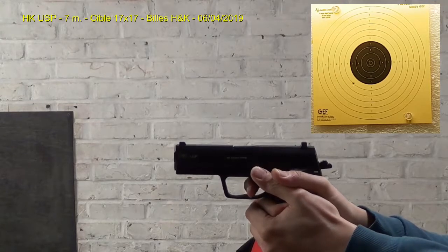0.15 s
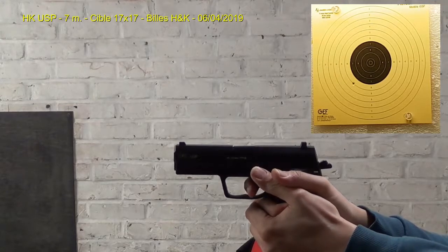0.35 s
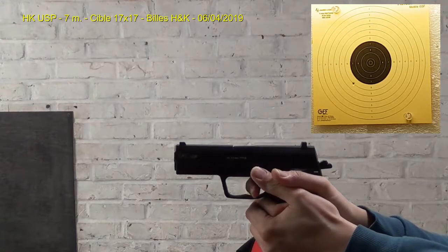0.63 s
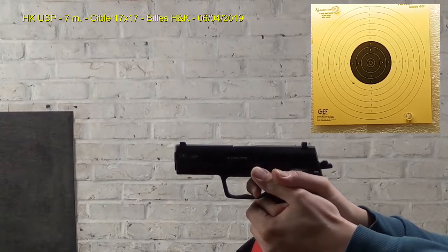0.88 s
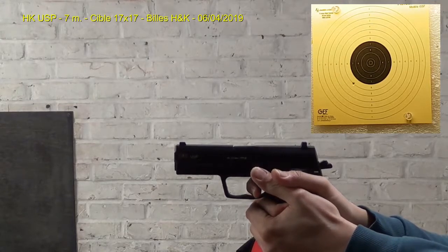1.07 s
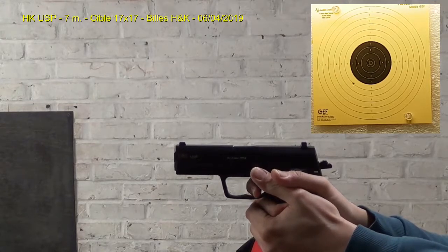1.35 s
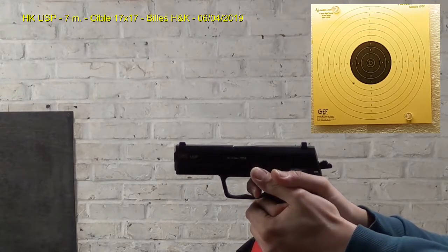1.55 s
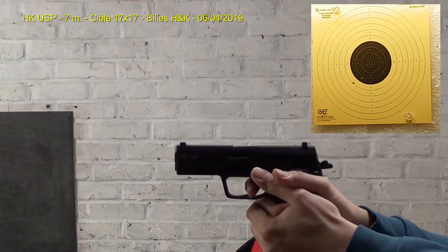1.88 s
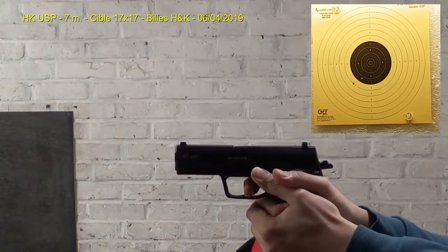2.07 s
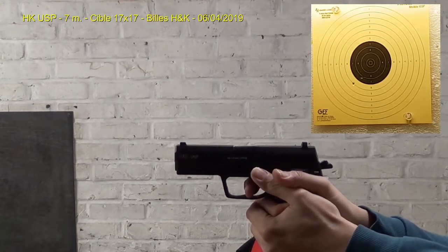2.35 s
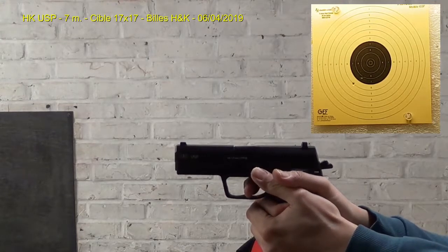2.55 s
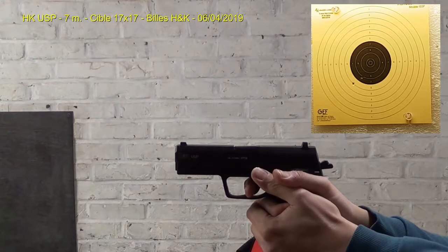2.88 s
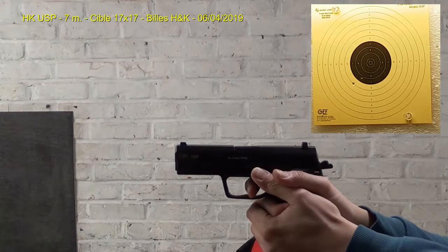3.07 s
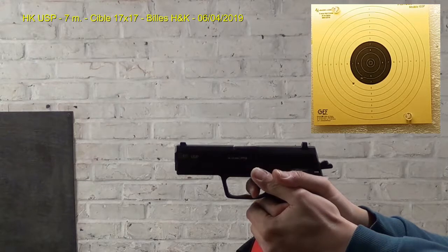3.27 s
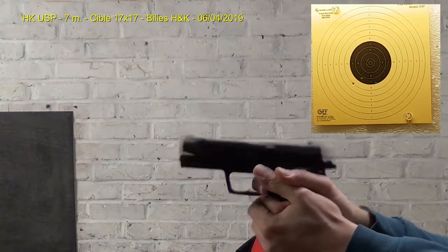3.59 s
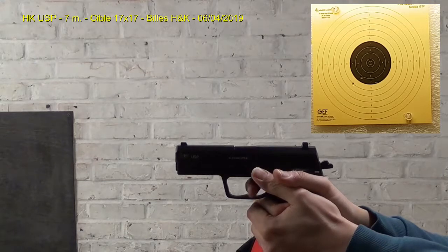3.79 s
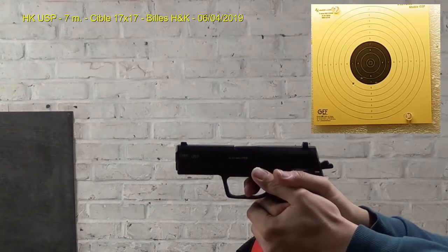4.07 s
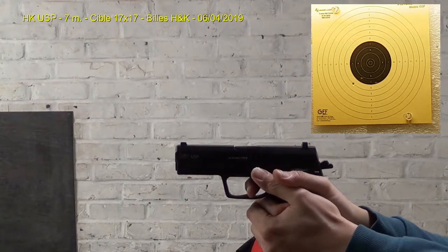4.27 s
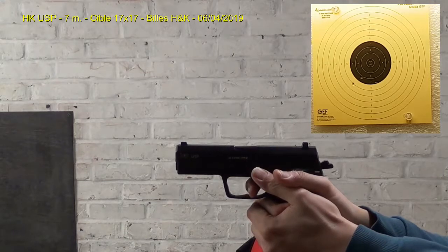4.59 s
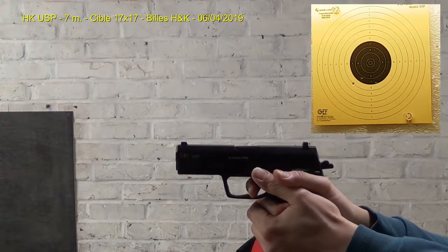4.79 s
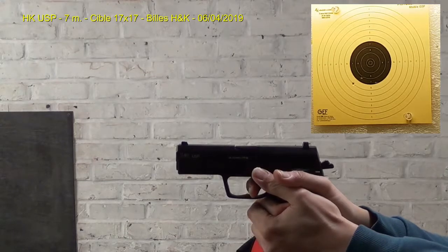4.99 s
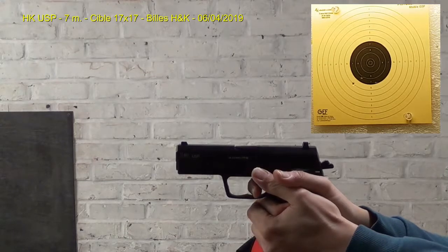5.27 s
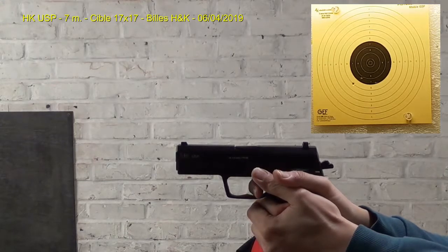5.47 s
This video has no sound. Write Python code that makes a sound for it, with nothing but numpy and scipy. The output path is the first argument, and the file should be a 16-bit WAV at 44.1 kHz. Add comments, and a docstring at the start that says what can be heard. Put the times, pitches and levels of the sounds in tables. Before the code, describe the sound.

A blowback air pistol fires three shots about two seconds apart in a hard brick room, close to the microphone. Each is a bright gas crack with a loud slide snap, followed at once by a pellet rattling in a far metal trap. After the first two, the action clacks home with a brief ring. Faint knocks and tiny trigger clicks fall between shots, and birds chirp softly outside over a steady hiss.

```python
"""Hard brick room: a blowback air pistol fires three shots close to a camera.
Each shot: hammer on valve, gas blast, slide on its rear stop, pellet rattling in the trap.
After the first two the action clacks home and rings slide and spring. Small knocks, a dull thud and
trigger ticks fall between shots. Birds chirp outside, over steady air, a thin whine and one far hum.
The camera's limiter flattens the shots and its gain creeps back up."""
import sys
import numpy as np
from scipy import signal
from scipy.fft import rfft, irfft
from scipy.io import wavfile
from scipy.ndimage import uniform_filter1d

SR = 44100
rng = np.random.default_rng(int(sys.argv[2]) if len(sys.argv) > 2 else 0)


def dump(signal):
    """Clip the signal to [-1, 1] and save it as 16-bit WAV at the path in sys.argv[1]."""
    limited = np.clip(np.atleast_2d(signal).T, -1, 1)
    pcm = np.round(limited * 32767).astype(np.int16)
    wavfile.write(sys.argv[1], SR, pcm)


N = 248724
FREQS = np.fft.rfftfreq(N, 1 / SR)
TIME = np.arange(N) / SR

# shots, timed at gas exit: (time [s], gas [dB], hammer [dB], slide [dB])
SHOTS = [(1.6482, -8.5, -24.5, -4), (3.6028, -6, -21, -2), (5.5542, -9, -26, -1)]
# action closing: (time [s], level [dB], spring [dB])
CLACKS = [(1.8672, -14, -50.5), (3.839, -11, -44.5)]
# pistol frame resonances: (frequency [Hz], width [Hz], lift [dB])
FRAME_MODES = [(917, 70, 10), (1763, 180, 7), (2230, 480, 4.5), (3200, 370, 5), (4156, 170, 8.5),
               (4940, 420, 8.5), (5490, 400, 5), (5900, 79, 1.5), (6900, 240, 4.5), (10180, 110, 1.5)]
# two microphone ports: (frequency [Hz], diffuse coherence [0-1], left lead [rad], left minus right [dB])
PORTS = [(60, 1, -0.19, 0.5), (170, 0.92, 0.25, 0), (403, 0.65, 0.6, 1), (1000, 0.15, 0.2, 5),
         (2100, 0.4, 0.39, 3.5), (4300, 0.77, -0.68, 1), (8400, 0.93, -.28, 0.8), (11000, 1, -.2, 0.5),
         (12860, 1, -.03, -1)]


def gain_of(db):
    return 10 ** (np.asarray(db) / 20)


def unit_rms(x):
    return x / np.sqrt(np.mean(x ** 2) + 1e-20)


def lookup(rows, hz, column=1):
    """Table column interpolated over log frequency."""
    table = np.array(rows)
    return np.interp(np.log(hz + 1), np.log(table[:, 0] + 1), table[:, column])


def add(mix, start_s, sound):
    part = mix[max(round(start_s * SR), 0):][:len(sound)]
    part += sound[:len(part)]


def body(colour, modes=(), pitch=1, size=4096):
    """Minimum-phase impulse response: broad spectrum plus resonances."""
    hz = abs(np.fft.fftfreq(size, 1 / SR)) / pitch
    peaks_db = sum(lift / (1 + (2 * (hz - centre) / width) ** 2) for centre, width, lift in modes)
    log_gain = np.log(gain_of(lookup(colour, hz) + peaks_db))
    spectrum = np.exp(np.conj(signal.hilbert(log_gain)))
    return np.fft.ifft(spectrum).real[:size // 2]


def blows(hits, response, chatter, chatter_s):
    """Per (time [s], level [dB]): impulse plus dying chatter excites a body. 0 dB = 10 ms at rms 1."""
    t, out = TIME[:SR // 5], np.zeros(N)
    for s, db in hits:
        force = rng.standard_normal(len(t)) * np.exp(-t / chatter_s)
        force *= chatter / np.linalg.norm(force)
        force[0] += 1
        sound = signal.fftconvolve(force, response)
        add(out, s, gain_of(db) * sound / np.linalg.norm(sound) * np.sqrt(SR / 100))
    return out


def diffuse(pair):
    """Mixes two unrelated signals to the ports' diffuse-field coherence."""
    common, opposed = rfft(pair, N)
    angle = np.arccos(np.clip(lookup(PORTS, FREQS), 0, 1)) / 2
    return irfft(np.cos(angle) * common + np.array([[1], [-1]]) * np.sin(angle) * opposed, N)


def room_tail(stretch, build_s=0.00053):
    """Dense reflections: fast build-up, each band with its own decay."""
    decay = [(80, 0.56), (250, 0.23), (600, 0.33), (1500, 0.35), (3000, 0.36), (6000, 0.36), (10000, 0.29),
             (15000, 0.27)]  # (frequency [Hz], t60 [s])
    hz, t, bands = signal.stft(rng.standard_normal((2, SR)), SR, nperseg=256)
    t60_s = stretch * lookup(decay, hz)[:, None]
    tail = signal.istft(bands * gain_of(-60 * t / t60_s), SR, nperseg=256)[1][:, :SR]
    tail *= 1 - np.exp(-TIME[:SR] / build_s)
    tail = diffuse(tail)[:, :SR]
    return tail / np.linalg.norm(tail[0])


def in_room(x, wet_db, near=1, stretch=1):
    """Direct sound and first echoes, scaled by near, plus the tail, its t60 scaled by stretch."""
    echoes = [(.00179, 0.69), (.0040, 0.26), (0.0102, 0.25), (0.0137, .15), (.0208, 0.11)]  # near walls and floor: (delay [s], gain [ratio])
    early = np.zeros(SR)
    early[0] = 1
    for delay_s, gain in echoes:
        early[round(delay_s * SR)] += gain
    response = near * early + gain_of(wet_db) * room_tail(stretch)
    return signal.fftconvolve(x[None], response, axes=1)[:, :N]


def background(air_db=-52, whine_db=-58, whine_hz=15625):
    """Steady air and hiss; thin electronic whine."""
    colour = [(15, -32), (32, -5.5), (50, 5), (90, -7.5), (301, -7), (344, -8), (588, -8.5), (749, -10.5),
              (1580, -12.5), (2430, -14.5), (3440, -16.5), (4040, -17.5), (6040, -18.5), (14500, -24.5),
              (16000, -47)]  # air spectrum: (frequency [Hz], density [dB])
    spectrum = rfft(rng.standard_normal((2, N))) * gain_of(lookup(colour, FREQS))
    air = unit_rms(diffuse(irfft(spectrum, N)))
    whine = np.sqrt(2) * np.sin(2 * np.pi * whine_hz * TIME)
    return gain_of(air_db) * air + gain_of(whine_db) * whine


def spring(hz=1818, t60_s=2, start_db=-54):
    """Recoil spring: a thin, long note after each clack; at the start still ringing from a prior shot."""
    plucks = [(0, start_db)] + [(s, db) for s, _, db in CLACKS]
    envelope = sum((TIME >= s) * gain_of(db - 60 * np.maximum(TIME - s, 0) / t60_s) for s, db in plucks)
    return envelope * np.sin(2 * np.pi * hz * TIME)


def chirp(start_hz, length_s, end_ratio, warble, warble_hz=42, jitter=.013):
    """One whistled glide with quick warble and slight pitch wander."""
    t = TIME[:round(length_s * SR)]
    wander = unit_rms(uniform_filter1d(rng.standard_normal(SR // 4), 90))[:len(t)]
    trill = np.sin(2 * np.pi * (warble_hz * rng.uniform(0.7, 1.3) * t + rng.random()))
    hz = start_hz * end_ratio ** (t / length_s) * (1 + warble * trill + jitter * wander)
    tone = np.sin(2 * np.pi * np.cumsum(hz) / SR)
    return unit_rms(tone * signal.windows.tukey(len(t), .4))


def birds(side_db=-8, side_lag_s=.04, far_per_s=5, far_hz=(3660, 5740),
          far_slur_db=-54.5, far_peep_db=-58.5):
    """Falling slurs with fainter side notes, short peeps, random far birds; reflections only."""
    slurs = [(.215, 5880, -46), (0.593, 4550, -53.5), (.76, 4380, -54.5), (.925, 4600, -51.5),
             (1.06, 5400, -51), (1.246, 5660, -51.5), (1.291, 4500, -54), (1.36, 5220, -53.5),
             (2.25, 5000, -49.5), (2.525, 4630, -57), (2.645, 5780, -51), (2.73, 4260, -59.5),
             (2.865, 5200, -53), (3.051, 5650, -55.5), (3.113, 4350, -54), (3.41, 4890, -52),
             (4.019, 4630, -55), (4.12, 5490, -49.5), (4.39, 4610, -52.5), (4.575, 4920, -49.5),
             (4.889, 5090, -50.5), (5.18, 4945, -52)]  # (time [s], start pitch [Hz], level [dB])
    peeps = [(.01, 3730, -51), (.063, 5360, -52.5), (.139, 3997, -47), (.445, 4150, -49),
             (0.525, 5830, -53.5), (.82, 5630, -55.5), (3.005, 4110, -50), (4.815, 4745, -47)]  # (time [s], start pitch [Hz], level [dB])
    slur = dict(length_s=.105, end_ratio=.63, warble=.0607)
    peep = dict(length_s=.04, end_ratio=.95, warble=.018)
    song = np.zeros(N)
    for s, hz, db in slurs:
        add(song, s, gain_of(db) * chirp(hz, **slur))
        side_note = chirp(hz * rng.uniform(.8, 1.12), **slur)
        add(song, s + side_lag_s * rng.random(), gain_of(db + side_db) * side_note)
    for s, hz, db in peeps:
        add(song, s, gain_of(db) * chirp(hz, **peep))
    for s in np.arange(0, N / SR, 1 / far_per_s):
        slur_hz, peep_hz = rng.uniform(*far_hz, size=2)
        add(song, s + rng.random() / far_per_s, gain_of(far_slur_db) * chirp(slur_hz, **slur))
        add(song, s + rng.random() / far_per_s, gain_of(far_peep_db) * chirp(peep_hz, **peep))
    return in_room(song, wet_db=.5, near=0, stretch=1.09)


def hum(start_s=.7, length_s=0.93, hz=398, db=-61, drift=.018, flutter=0.78):
    """Far hum: fades in and out once, wavering in pitch and level."""
    size = round(length_s * SR)
    waver, swell = unit_rms(uniform_filter1d(rng.standard_normal((2, N)), size=3000))[:, :size]
    tone = np.sin(2 * np.pi * np.cumsum(hz * (1 + drift * waver)) / SR)
    envelope = signal.windows.tukey(size, .25) * abs(1 + flutter * swell)
    out = np.zeros(N)
    add(out, start_s, gain_of(db) * envelope * tone)
    return out


def hammer(lead_s=.0069, scrape_lead_s=.0024, scrape_db=-7):
    """Hammer scrapes free, then hits the valve just before the gas leaves; both ring the frame."""
    colour = [(100, -28), (500, -12), (850, 13), (1300, 1.5), (2400, 5), (3400, -1), (5500, -7),
              (10000, -2), (15000, -21.5)]  # (frequency [Hz], density [dB])
    falls = [(s - lead_s, db) for s, _, db, _ in SHOTS]
    scrapes = [(s - scrape_lead_s, db + scrape_db) for s, db in falls]
    strikes = blows(scrapes + falls, body(colour, FRAME_MODES), chatter=7, chatter_s=0.00081)
    return in_room(strikes, wet_db=-18.5, near=0.8)


def muzzle(crack_db=-9, crack_hz=7900, crack_width_hz=3200):
    """Bright crack and short gas hiss; the barrel points away, so most arrives by the walls."""
    colour = [(30, -24.5), (105, -18.5), (145, -3.5), (350, -2), (800, -1), (2000, 0.5), (3600, -2),
              (6500, 1.5), (9500, 3.5), (12000, -3), (16000, -19.5)]  # (frequency [Hz], density [dB])
    modes = [(274, 58, 12.5), (487, 170, 11.4), (1196, 300, 8.4), (5720, 170, 3.8), (6040, 120, 9.9),
             (6750, 160, 13), (7720, 290, 3.2), (7970, 91, 10), (9130, 180, 5.5)]  # (frequency [Hz], width [Hz], lift [dB])
    crack_colour = [(100, -3.0), (16000, -4.5)]  # (frequency [Hz], density [dB])
    crack_modes = [(crack_hz, crack_width_hz, 20)]
    bursts = [(s, db) for s, db, _, _ in SHOTS]
    gas = blows(bursts, body(colour, modes), chatter=0.59, chatter_s=0.0092)
    crack = blows(bursts, body(crack_colour, crack_modes), chatter=.8, chatter_s=.003)
    return (in_room(gas, wet_db=11, near=0.35)
            + gain_of(crack_db) * in_room(crack, wet_db=-2, near=2.2, stretch=0.26))


def slide(travel_s=.047):
    """Slide flies back onto its rear stop and rings the frame."""
    colour = [(100, -31), (400, -4), (1200, 4), (2400, 3), (3500, -4.5), (6000, 3), (10000, 7),
              (12500, 1.5), (16000, -23)]  # (frequency [Hz], density [dB])
    stops = [(s + travel_s, db) for s, _, _, db in SHOTS]
    strikes = blows(stops, body(colour, FRAME_MODES), chatter=3, chatter_s=0.013)
    return in_room(strikes, wet_db=3.5)


def trap(flight_s=.092, db=-13):
    """Pellet slams into the far metal trap and rattles round."""
    colour = [(50, -26.5), (130, -14), (250, -3.5), (420, 1.5), (700, 3.5), (1100, -4.5), (1700, 0.5),
              (2500, 2), (3800, -4), (8000, -6.5), (11000, -9.5), (15000, -39)]  # (frequency [Hz], density [dB])
    modes = [(251, 31, 5.4), (534, 65, 4.6), (658, 38, 2.4), (736, 40, 3.1), (867, 70, 6.1),
             (1090, 56, 7.2), (1920, 110, 4.5), (2163, 150, 6.2), (2910, 82, 2.6)]  # (frequency [Hz], width [Hz], lift [dB])
    arrivals = [(s + flight_s, db) for s, *_ in SHOTS]
    strikes = blows(arrivals, body(colour, modes), chatter=2.6, chatter_s=0.023)
    return in_room(strikes, wet_db=15.5, stretch=0.77)


def clack():
    """Action snaps home and rings the frame."""
    colour = [(100, -16), (500, -20), (1000, -1.5), (1900, -0.5), (3000, -1.5), (5000, -11.5), (7500, -1),
              (12500, -7), (16000, -26)]  # (frequency [Hz], density [dB])
    snaps = [(s, db) for s, db, _ in CLACKS]
    strikes = blows(snaps, body(colour, FRAME_MODES), chatter=2.5, chatter_s=0.0013)
    return in_room(strikes, wet_db=-1, stretch=0.7)


def slide_ring(ring_db=-15):
    """Steel slide rings on after each clack, slightly detuned each time."""
    modes = [(940, -4, 0.2), (1030, -11, 0.39), (1750, 0, 0.25), (1750, -4, 0.18), (2160, 6, 0.14),
             (3060, 0, 0.17), (3950, -8, 0.24), (5500, -8, 0.19)]  # (frequency [Hz], level [dB], t60 [s])
    t, out = TIME[:SR // 2], np.zeros(N)
    for s, db, _ in CLACKS:
        for hz, mode_db, t60_s in modes:
            note = np.sin(2 * np.pi * hz * rng.uniform(.99, 1.01) * t)
            add(out, s, gain_of(ring_db + db + mode_db - 60 * t / t60_s) * note)
    return out


def knocks():
    """Small knocks across the room, like dropped pellets, then one last low, dull thud."""
    hits = [(2.306, -40, 1.13), (3.959, -43, 0.97), (4.018, -45, 0.82), (4.065, -49.5, 0.98),
            (4.384, -47, 0.28)]  # (time [s], level [dB], pitch [ratio])
    colour = [(60, -29.5), (200, -17), (330, -3), (480, 5), (750, 1.5), (1100, 1.5), (1800, -10.5),
              (3000, -24), (9000, -35)]  # (frequency [Hz], density [dB])
    strikes = sum(blows([(s, db)], body(colour, pitch=pitch), chatter=0.99, chatter_s=0.005)
                  for s, db, pitch in hits)
    return in_room(strikes, wet_db=8.5, stretch=0.91)


def trigger():
    """Tiny clicks as the finger takes up the trigger."""
    ticks = [(3.0685, -55), (3.4368, -52.5), (5.3815, -48)]  # (time [s], level [dB])
    colour = [(200, 1), (1500, -5), (3400, 5), (6500, -8), (10000, 8), (13000, -13), (16000, -27)]  # (frequency [Hz], density [dB])
    clicks = blows(ticks, body(colour), chatter=2.9, chatter_s=0.001)
    return in_room(clicks, wet_db=-5)


def scene():
    """Frontal sounds differ in level and phase between the ports; ambience is nearly centred."""
    front = muzzle() + hammer() + slide() + clack() + slide_ring() + spring()
    front += trap() + knocks() + trigger()
    ambience = birds() + background() + hum()
    side = np.array([[.5], [-.5]])  # left, right
    hz = np.fft.rfftfreq(2 * N, 1 / SR)
    port_gain = gain_of(side * lookup(PORTS, hz, column=3))
    port_rad = side * lookup(PORTS, hz, column=2)
    front = irfft(rfft(front, 2 * N) * port_gain * np.exp(1j * port_rad))[:, :N]
    return front + ambience * gain_of(side * -.5)


def level_db(x, size):
    """Short-time power, mean of both channels."""
    return 10 * np.log10(abs(uniform_filter1d((x ** 2).mean(0), size)) + 1e-12)


def peak_hold(over_db, db_per_s):
    """Instant attack, constant-rate release."""
    return np.maximum.accumulate(over_db + db_per_s * TIME) - db_per_s * TIME


def record(dry, knee_db=-14, depth_db=8, start_db=6, recover_db_per_s=5.5,
           overload_db=3, limit_db=-14, release_db_per_s=260, cutoff_hz=16300):
    """Slow gain control, soft overload, fast limiter, low-pass."""
    duck_db = np.clip(level_db(dry, size=128) - knee_db, 0, depth_db)
    duck_db[0] = start_db  # gain still low from a prior shot
    ducked = dry / gain_of(peak_hold(duck_db, recover_db_per_s))
    saturated = gain_of(overload_db) * np.tanh(ducked / gain_of(overload_db))
    over_db = np.maximum(level_db(saturated, size=400) - limit_db, 0)
    cut_db = uniform_filter1d(peak_hold(over_db, release_db_per_s), size=64)
    limited = np.tanh(saturated / gain_of(cut_db))
    lowpass = signal.firwin(511, cutoff_hz, window=("kaiser", 9), fs=SR)
    return signal.oaconvolve(limited, lowpass[None], "same")


dry = scene()
out = record(dry)
dump(out)
```